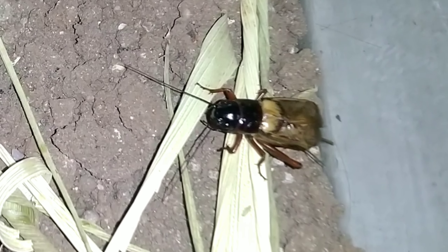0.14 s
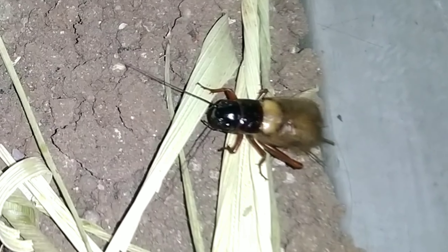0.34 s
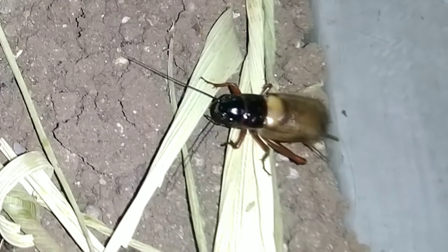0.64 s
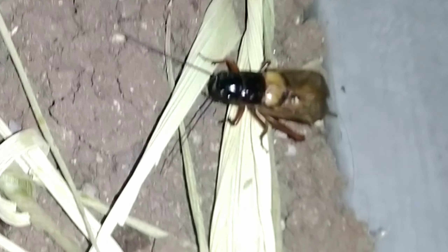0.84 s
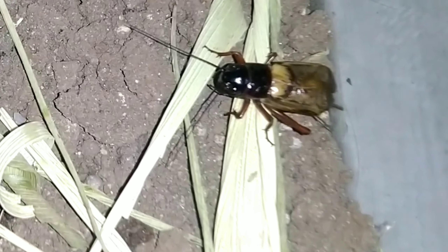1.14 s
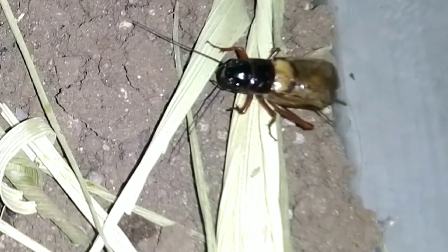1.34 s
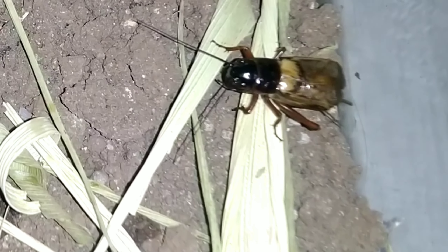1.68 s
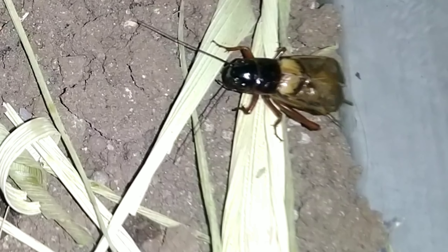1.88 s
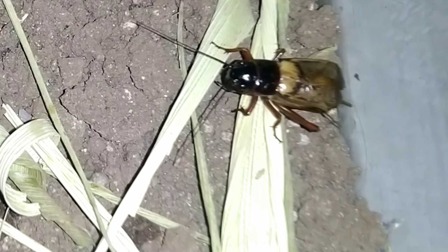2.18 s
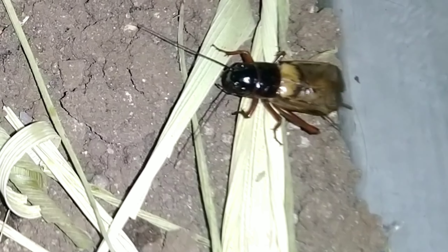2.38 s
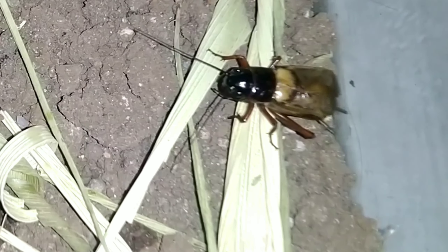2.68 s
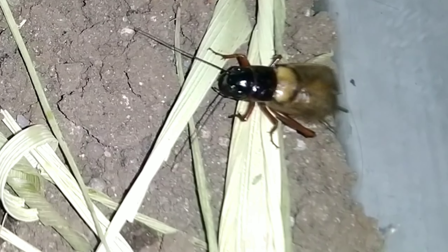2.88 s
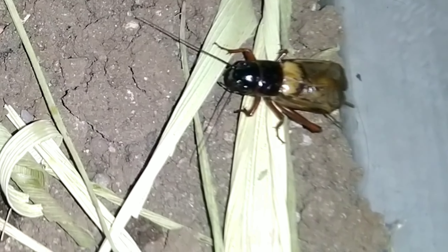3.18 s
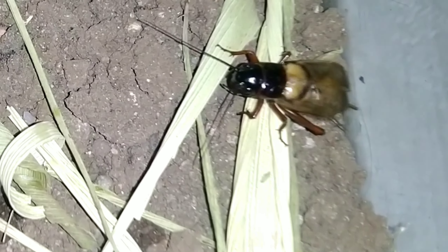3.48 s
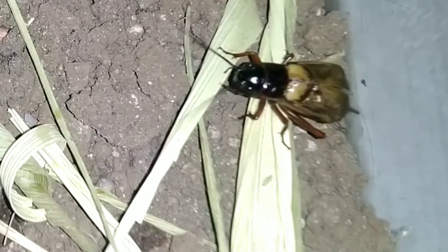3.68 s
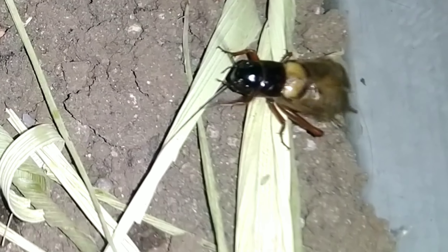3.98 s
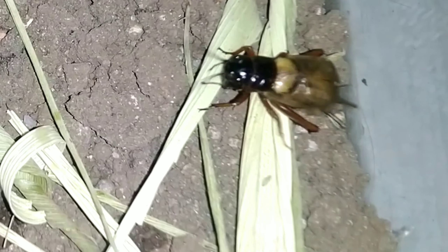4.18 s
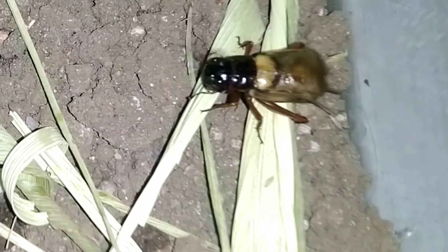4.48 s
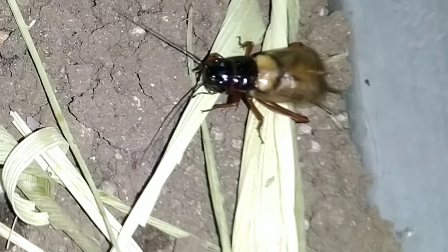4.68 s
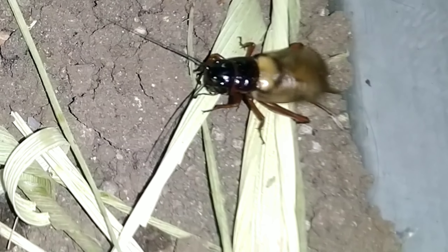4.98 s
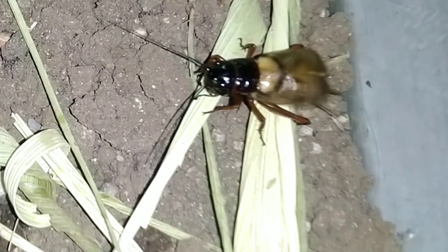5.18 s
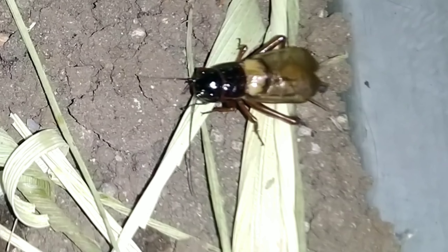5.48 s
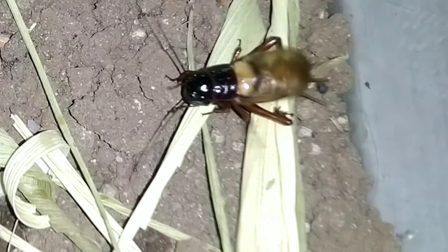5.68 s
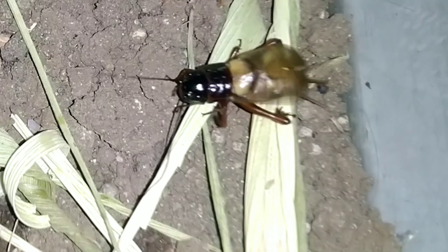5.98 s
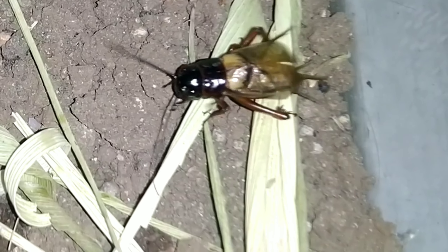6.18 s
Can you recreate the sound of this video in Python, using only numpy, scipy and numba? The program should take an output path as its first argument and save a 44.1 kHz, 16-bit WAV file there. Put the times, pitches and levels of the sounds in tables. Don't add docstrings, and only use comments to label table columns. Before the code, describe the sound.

One cricket, very close, chirps about twenty-one times in just over six seconds. Each chirp is a tiny burst of one to three high, slightly falling whistles with a gritty edge. Early chirps are spaced irregularly with one longer gap; later ones come quickly, about four a second. Nearby wall and ground return a short bright echo. A faint low machine hum dips after chirps. Stereo handheld microphone, night.

```python
import sys
import numpy as np
from scipy import signal
from scipy.io import wavfile
from scipy.ndimage import uniform_filter1d
from numba import njit

SR = 44100
rng = np.random.default_rng(int(sys.argv[2]) if len(sys.argv) > 2 else 0)


def store_wav(level_fs):
    pcm = np.round(np.clip(np.atleast_2d(level_fs), -1, 1) * 32767)
    wavfile.write(sys.argv[1], SR, pcm.T.astype(np.int16))


def level_to_linear(level):
    exponent = np.asarray(level, float) / 20
    return 10 ** exponent


N = 279594
T = np.arange(N) / SR

# (middle stroke time [s], level [dB], lead stroke length [ms], under 2 for none,
# lead level [dB], delay of the last stroke [ms], under 10 for none)
CHIRPS = [(0.142, -15.5, 11.6, -29.5, -3), (0.3814, -15, 9.5, -22.5, 32), (0.6555, -15.5, 9.9, -14, 0),
          (1.0004, -14, 14, -17, 30), (1.33, -15.5, 12.6, -17.5, 5), (2.026, -16, 9.5, -26.5, 32),
          (2.347, -15.5, 12, -15.5, 33), (2.6634, -14.5, 13, -17.5, 31.5),
          (2.933, -14.5, 12.8, -16.5, 29.5), (3.31, -14.5, 13, -17, 32), (3.562, -15, 12.7, -16.5, 31.5),
          (3.7656, -14.5, 10.3, -16.5, 31.5), (4.0395, -14, 10.4, -17.5, 30.5), (4.248, -15, 0, -29, 3),
          (4.4661, -15, 8.4, -30, 29.5), (4.7313, -14, 12.5, -16, 30), (4.9806, -13.5, 13, -15.5, 32),
          (5.2359, -14, 12.8, -15.5, 0), (5.4395, -14, 10.5, -15.5, 30), (5.6825, -14, 12.4, -15.5, -9),
          (5.9939, -14.5, 10, -14.5, 28.5)]
# (time [s], length [ms], level [dB], start frequency [Hz], scrape [dB])
SLIPS = [(0.6885, 6.5, -18.5, 5150, -11), (1.3602, 8.3, -14.5, 5164, -20), (4.2197, 4.5, -23, 5450, -5),
         (6.0554, 12.5, -15, 5400, -22), (5.2657, 7.8, -15, 5200, -18), (5.7132, 7, -18.5, 5160, -14)]
# (length [ms], level over the chirp [dB], start frequency [Hz], octave [dB], scrape [dB])
MIDDLE_STROKE = (13.5, -0.5, 5428.5, -13.5, -17)
LAST_STROKE = (14.5, 0.6, 5411, -15, -24)
# (length [ms], level [dB], frequency [Hz], octave [dB], scrape [dB])
SCATTER = (.3, .2, 20, .7, 4.2)
# (time [s], whistle left minus right [dB], octave left minus right [dB],
# left lead [rad], octave beam [dB])
FACING = [(0, 3.5, -17.5, 1, -6.5), (1.698, 4, -4, 0.57, 3), (3.3, 5.5, -8.5, 0.75, -1.7),
          (4.5, 2.5, -7.5, 0.22, -0.2), (5.3, 0.2, -2, 0.35, -1), (5.7, -2, -6.5, 0.16, 3.5),
          (6.3, -2.5, -9, .1, 1.5)]
# (share of stroke [1], level [dB], left minus right [dB])
STROKE_SHAPE = [(-.2, -30, 0), (0, -14, -1), (.14, -5, -2), (.29, -2.6, -3), (.5, -.3, 0), (.68, .2, 2.5),
                (.86, -1, .5), (1, -10, -4)]
# (share of stroke [1], level [dB])
OCTAVE_SHAPE = [(-.2, -19.5), (0, -15), (.15, 2), (.5, -7), (.8, -2.5), (1, -3)]
# (frequency [Hz], width [Hz], level [dB])
SCRAPE_MODES = [(5360, 510, -0.5), (6030, 2000, -8.5), (9300, 2000, -30), (10630, 2400, -0.5),
                (12900, 1800, -12), (13400, 1300, -12), (15200, 1200, -12.5)]
# (time [s], level [dB])
OPENINGS = [(0.097, -50), (0.338, -60), (0.606, -44.5), (0.955, -48.5), (1.286, -43.5), (1.983, -49),
            (2.303, -42), (2.618, -44.5), (2.889, -45.5), (3.265, -45), (3.517, -47.5), (3.999, -65),
            (4.426, -50), (4.688, -43.5), (4.938, -42), (5.192, -43), (5.64, -51), (5.951, -48.5)]
# (time [s], level [dB], wing frequency [Hz], upper mode [dB], top mode [dB])
FAILED_STROKES = [(0.011, -46.5, 4930, -21, -19), (0.316, -44, 4920, -15, -18.5),
                  (0.832, -41.5, 4820, -12, -40), (0.848, -49.5, 5060, -15, -13),
                  (1.876, -41.5, 4760, -17.5, -40), (1.91, -53, 4600, -16, -22),
                  (1.939, -48, 5200, -15.5, -27), (3.66, -48, 4940, -14, -29),
                  (3.982, -54.5, 4550, -15.5, -18.5), (4.276, -35, 5530, 9, -24),
                  (4.292, -45.5, 4620, -17, -17), (4.349, -48.5, 4720, -15, -40),
                  (4.378, -55, 4650, -31, -31), (5.323, -38.5, 4940, -25.5, -37),
                  (5.539, -45.5, 4600, -32, -37), (5.627, -40, 5000, -13, -34), (5.766, -47, 4760, -9, -28),
                  (5.792, -48.5, 4840, -17, -20), (5.927, -42.5, 4540, -19, -41),
                  (6.114, -41.5, 4540, -20, -35), (6.209, -46.5, 4650, -32, -34.4),
                  (6.231, -43, 5090, -1, 9), (6.293, -47.5, 4860, -10, -26)]
# (delay [ms], level [dB], left minus right [dB], smear [ms])
ECHOES = [(4.316, -13, 11, 0.38), (7.922, -28.5, -30.5, 0.51), (31.7, -22.5, -4.5, 0.46),
          (51.26, -29.5, -10, 3.5)]
# (frequency [Hz], width [Hz], decay time t60 [s], level [dB])
YARD = [(5240, 9200, 0.44, -16.5), (10500, 10000, 0.4, -14.5), (13000, 4400, 0.42, -15.5),
        (15540, 2000, .35, -23)]
# (time [s], level [dB])
RUSTLE = [
    (0, -82),
    (.1, -59),
    (.25, -61),
    (.4, -85),
]
# (time [s], length [s], frequency [Hz], level [dB], overtone slope [dB])
SQUEAKS = [
    (0.072, 0.064, 264, -48.5, -7),
    (0.582, 0.058, 1334, -62, -49),
    (2.574, 0.2, 2110, -72, -42.5),
    (4.61, 0.093, 1533, -58.5, -28),
]
# (time [s], peak level [dB], frequency [Hz])
KNOCKS = [
    (0.743, -30, 420),
    (3.928, -40, 457),
    (3.973, -41.5, 450),
    (6.047, -35.5, 440),
]
# (frequency [Hz], level per Hz [dB])
HUM_SPECTRUM = [(15, -40), (25, 0.5), (58, -2.5), (157, -1.5), (236, -21.5), (301, -10.5), (416, -43.5),
                (451, -28.5), (1700, -36), (2160, -32.5), (4610, -44.5), (5280, -40), (6210, -51),
                (14000, -47.5), (16000, -64)]
# (frequency [Hz], width [Hz], level [dB])
DRONES = [(74.6, 19, -53), (163, 7.3, -55.5), (193.14, 6.8, -55.5), (307, 28, -65)]

END_HZ = 4975.6
LEAD_IN_MS = 3
REBOUND_DB, REBOUND_MS = -9.5, 0.86
LEAD_SWING_RAD, OCTAVE_SWING_RAD = -1.2, 4.2
THIRD_DB, THIRD_PAN_DB, THIRD_MODE_HZ, THIRD_WIDTH_HZ = -37.5, -9, 15300, 450
SCRAPE_BEAM = 0.13
SCRAPE_TAIL_MS, SCRAPE_FLUTTER_DB = 4, 2.5
REOPEN_MS = 16.1
LEAD_HZ, LEAD_OCTAVE_DB, LEAD_SCRAPE_DB = 5450, -10.5, -21
FULL_LEAD_MS, FULL_LEAD_DB = 12.6, -16
WEAK_HZ_PER_DB, SHORT_SCRAPE_DB_PER_MS, WEAK_SCRAPE_PER_DB = 18.5, 1.93, 0.7
SLIP_OCTAVE_DB = -10
OPENING_HZ, OPENING_UPPER_DB, OPENING_TOP_DB, OPENING_MS = 4790, -13, -44.5, 5.6
FAILED_MS = 4.47
EARLIER_S, EARLIER_DB = 1.4, -5.5
KNOCK_RISE_S, KNOCK_DECAY_S = 0.0008, 0.0017
SQUEAK_HISS = 3.5
HUM_DB = -45.5
MIC_LOW_HZ, MIC_TOP_HZ = 46, 15650
MIC_DIP_HZ, MIC_DIP_WIDTH_HZ, MIC_DIP = 7120, 270, 0.27
AGC_TOP_DB, AGC_RATIO = -30.5, 1.378
AGC_ATTACK_S, AGC_RELEASE_S, AGC_AHEAD_S = 0.026, 0.075, 0.0072
BASS_DUCK = 1.96


@njit
def svf(x, hz, width):
    y, b, l = np.empty(len(x)), 0., 0.
    g, k = np.tan(np.pi * hz / SR), width / hz
    for i in range(len(x)):
        v = (b + g * (x[i] - l)) / (1 + g * (g + k))
        b, l, y[i] = 2 * v - b, l + 2 * g * v, k * v
    return y


@njit
def follow(x, attack, release):
    y, e = np.empty(len(x)), 3e-2
    for i in range(len(x)):
        e += (x[i] - e) * (attack if x[i] > e else release)
        y[i] = e
    return y


def unit(x):
    return x / np.sqrt(np.mean(x ** 2))


def resonant_noise(n, hz, width):
    once = svf(rng.standard_normal(n), 1. * hz, 1. * width)
    return unit(svf(once, 1. * hz, 1. * width))


def band(hz, width):
    return resonant_noise(N, hz, width)


def walk(rate):
    k = int(SR / rate)
    held = np.repeat(rng.standard_normal(N // k + 1), k)
    return unit(uniform_filter1d(uniform_filter1d(held, k), k)[:N])


def pan(db):
    return level_to_linear(np.array([db / 2, -db / 2]))


def add(out, s, x):
    i = int(s * SR)
    n = min(x.shape[-1], N - i)
    out[..., i:i + n] += x[..., :n]


def song():
    rows = []
    for s, db, lead_ms, lead_db, last_ms in CHIRPS:
        weak_db, short_ms = max(FULL_LEAD_DB - lead_db, 0), FULL_LEAD_MS - lead_ms
        if lead_ms > 2:
            lead_s = s - (REOPEN_MS + lead_ms) / 1000
            lead_hz = LEAD_HZ - WEAK_HZ_PER_DB * weak_db
            scrape_db = LEAD_SCRAPE_DB + SHORT_SCRAPE_DB_PER_MS * short_ms + WEAK_SCRAPE_PER_DB * weak_db
            rows.append((lead_s, lead_ms, lead_db, lead_hz, LEAD_OCTAVE_DB, scrape_db))
        rows.append((s, MIDDLE_STROKE[0], db + MIDDLE_STROKE[1], *MIDDLE_STROKE[2:]))
        if last_ms > 10:
            rows.append((s + last_ms / 1000, LAST_STROKE[0], db + LAST_STROKE[1], *LAST_STROKE[2:]))
    for s, ms, db, hz, scrape_db in SLIPS:
        rows.append((s, ms, db, hz, SLIP_OCTAVE_DB, scrape_db))
    return np.array(rows) + rng.standard_normal((len(rows), 6)) * np.r_[0, SCATTER]


def strokes():
    s, *facing = np.transpose(FACING)
    share, shape_db, swing_db = np.transpose(STROKE_SHAPE)
    octave_share, octave_shape_db = np.transpose(OCTAVE_SHAPE)
    out, grit = np.zeros((2, N)), np.zeros(N)
    wobble, rough, rows = walk(250), walk(900), song()
    ports = np.array([[.5], [-.5]])
    for (t0, ms, db, start_hz, oct_db, scrape_db), start in zip(rows, rng.random(len(rows))):
        t = np.arange(int((ms + 22) * SR / 1000)) * 1000 / SR - LEAD_IN_MS
        t0 = t0 - LEAD_IN_MS / 1000
        i = int(t0 * SR)
        slow, fast = wobble[i:i + len(t)], rough[i:i + len(t)]
        fade_in = np.clip(1 + t / LEAD_IN_MS, 0, 1) ** 2
        at, after = t / ms, np.maximum(t - ms, 0)
        closing = np.clip(at, 0, 1) - .5
        side, oct_side, lead, beam_db = (np.interp(t0, s, c) for c in facing)

        hz = END_HZ + (start_hz - END_HZ) * np.clip(1 - at, -.25, 1)
        phase = 2 * np.pi * (start + np.cumsum(hz) / SR) + 0.028 * slow
        driven = level_to_linear(np.interp(at, share, shape_db)) * np.exp(-after / .5) * fade_in
        x = after / REBOUND_MS
        rebound = level_to_linear(REBOUND_DB) * x * np.exp(1 - x)
        body = uniform_filter1d(uniform_filter1d(driven - rebound, size=30), size=30)
        whistle = body * level_to_linear(0.27 * slow) * np.sin(phase + ports * (lead + LEAD_SWING_RAD * closing))
        tone = whistle * pan(side + np.interp(at, share, swing_db))

        upper = level_to_linear(np.interp(at, octave_share, octave_shape_db)) * np.exp(-after) * fade_in
        upper = upper * level_to_linear(oct_db + beam_db + 0.47 * fast)
        octave = upper * np.sin(2 * phase + ports * (OCTAVE_SWING_RAD * closing - .4))
        tone += octave * pan(oct_side)[:, None]

        third = driven / (1 + ((3 * hz - THIRD_MODE_HZ) / THIRD_WIDTH_HZ) ** 2)
        third = third * level_to_linear(THIRD_DB + 3.1 * fast) * np.sin(3 * phase)
        tone += third * pan(THIRD_PAN_DB)[:, None]
        add(out, t0, np.sqrt(2) * level_to_linear(db) * tone)

        scrape_level = level_to_linear(db + scrape_db + SCRAPE_BEAM * beam_db)
        growth = np.clip(1.2 + t / 3.3, .1, 1)
        add(grit, t0, scrape_level * fade_in * growth * np.exp(-after / SCRAPE_TAIL_MS))
    shared, own = [sum(level_to_linear(db) * band(hz, w) for hz, w, db in SCRAPE_MODES) for _ in range(2)]
    scrape = 0.55 * (shared + .9 * own * np.array([[1], [-1]]))
    return out + grit * level_to_linear(SCRAPE_FLUTTER_DB * wobble) * scrape


def ticks():
    out = np.zeros((2, N))
    s, side, *_ = np.transpose(FACING)
    upper = band(10980, 2400) + 0.15 * band(10300, 2500) + 0.43 * band(13000, 2500)
    top, broad = band(14900, 1731), band(2700, 2500)
    rows = [(t0, db, OPENING_HZ, OPENING_UPPER_DB, OPENING_TOP_DB, OPENING_MS) for t0, db in OPENINGS]
    rows += [(*row, FAILED_MS) for row in FAILED_STROKES]
    for t0, db, hz, upper_db, top_db, ms in rows:
        t = np.arange(int(3 * ms * SR / 1000)) * 1000 / SR
        span = slice(int(t0 * SR), int(t0 * SR) + len(t))
        x = t / (0.62 * ms)
        wing = resonant_noise(len(t), hz, 700) * pan(1.4 * np.interp(t0, s, side))[:, None]
        high = level_to_linear(upper_db) * upper[span] + level_to_linear(top_db) * top[span] + level_to_linear(-19.5) * broad[span]
        add(out, t0, level_to_linear(db) * x * np.exp(1 - x) * (wing + high))
    return out


def yard(x):
    t = np.arange(SR) / SR
    onset = np.clip(t / 0.0035, 0, 1)
    tail = np.zeros((2, SR))
    for hz, w, t60, db in YARD:
        noise = np.array([band(hz, w)[:SR] for _ in range(2)])
        fade = onset * level_to_linear(-60 * t / t60)
        tail += level_to_linear(db) * noise * fade * np.sqrt(w / SR / np.sum(fade ** 2))
    for ms, db, side, smear_ms in ECHOES:
        burst = rng.standard_normal((2, 600)) * np.exp(-t[:600] * 1000 / smear_ms)
        add(tail, ms / 1000, level_to_linear(db) * pan(side)[:, None] * unit(burst) / np.sqrt(600))
    return signal.fftconvolve(x.mean(axis=0)[None], tail, axes=1)[:, :N]


def handling(rough):
    level = level_to_linear(np.interp(T, *np.transpose(RUSTLE), right=-120) + 2.9 * rough)
    out = level * (band(420, 300) + 0.63 * band(2200, 2500))
    t = np.arange(SR // 50) / SR
    for t0, db, hz in KNOCKS:
        envelope = (1 - np.exp(-t / KNOCK_RISE_S)) * np.exp(-t / KNOCK_DECAY_S)
        add(out, t0, level_to_linear(db) * np.sin(2 * np.pi * hz * t) * envelope)
    return out


def squeaks(rough):
    out = np.zeros(N)
    for t0, length, hz, db, slope_db in SQUEAKS:
        t = np.arange(int(length * SR)) / SR
        phase = 2 * np.pi * hz * t * (1 - 0.0055 * t / length)
        stack = sum(level_to_linear(slope_db * k) * np.sin((k + 1) * phase) for k in range(6))
        flutter = level_to_linear(5.5 * rough[int(t0 * SR):][:len(t)])
        hiss = SQUEAK_HISS * svf(rng.standard_normal(len(t)), 1.12 * hz, .3 * hz)
        add(out, t0, level_to_linear(db) * np.sqrt(np.sin(np.pi * t / length)) * (flutter * stack + hiss))
    return out


def hum():
    out, swell = 0, walk(2.5)
    hzs, dbs = np.transpose(HUM_SPECTRUM)
    for hz in 28 * 2 ** np.arange(0, 9.1, 1 / 3):
        db = np.interp(np.log(hz), np.log(hzs), dbs) + 10 * np.log10(hz)
        db = db + 0.48 * swell + 2.1 * walk(6.5)
        difference = np.clip(hz / 650, .17, 1) * band(hz, hz / 3) * np.array([[1], [-1]])
        out = out + level_to_linear(db) * (band(hz, hz / 3) + difference)
    drones = sum(level_to_linear(db) * band(hz, w) for hz, w, db in DRONES) * pan(-2.5)[:, None]
    return (level_to_linear(HUM_DB) * unit(out) + drones) * pan(-0.036)[:, None]


def scene():
    cricket = strokes() + ticks()
    echo = yard(cricket)
    i = int(EARLIER_S * SR)
    add(echo, 0, level_to_linear(EARLIER_DB) * echo[:, i:i + int(.4 * SR)])
    rough = walk(170)
    return level_to_linear(2.5) * (cricket + echo) + handling(rough) + squeaks(rough) + hum()


def low_pass(x):
    return signal.sosfilt(signal.butter(12, 16490, fs=SR, output="sos"), x)


def record(dry):
    dry = signal.sosfilt(signal.butter(4, MIC_LOW_HZ, "high", fs=SR, output="sos"), dry)
    dry = signal.sosfilt(signal.cheby1(8, .5, MIC_TOP_HZ, fs=SR, output="sos"), dry)
    dry = np.array([v - MIC_DIP * svf(v, 1. * MIC_DIP_HZ, 1. * MIC_DIP_WIDTH_HZ) for v in dry])
    env = follow(np.abs(dry).max(axis=0), 1 / (AGC_ATTACK_S * SR), 1 / (AGC_RELEASE_S * SR))
    env = np.interp(T + AGC_AHEAD_S, T, env)
    gain = np.minimum(level_to_linear(AGC_TOP_DB) / env, 1) ** (1 - 1 / AGC_RATIO)
    bass = signal.sosfiltfilt(signal.butter(2, 450, fs=SR, output="sos"), dry)
    mix = (dry - bass) * gain + bass * gain ** BASS_DUCK
    return low_pass(mix)


dry = scene()
out = record(dry)
store_wav(out)
```